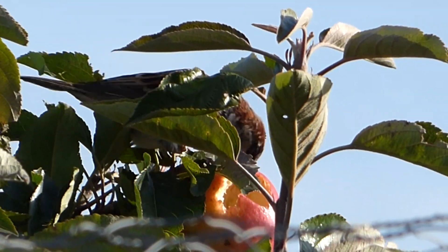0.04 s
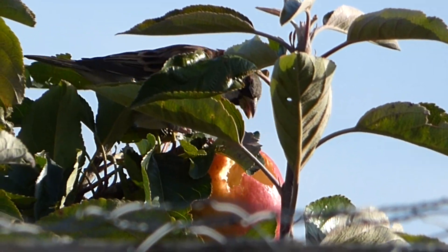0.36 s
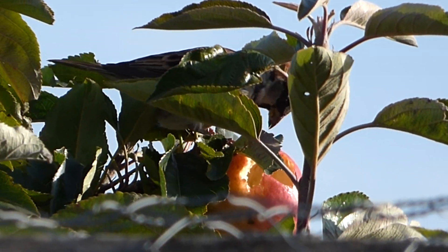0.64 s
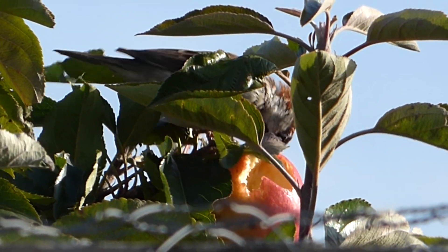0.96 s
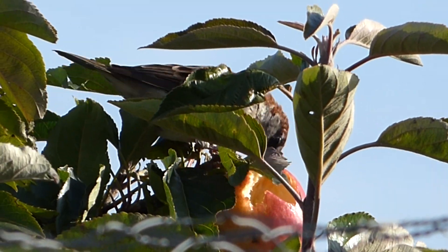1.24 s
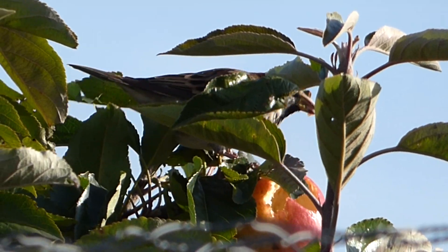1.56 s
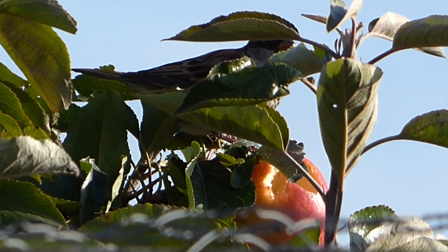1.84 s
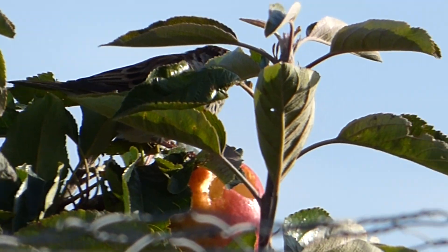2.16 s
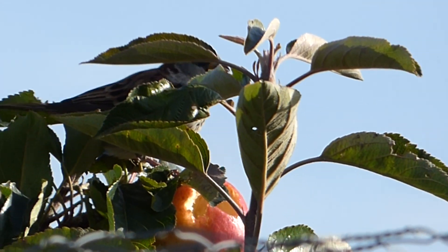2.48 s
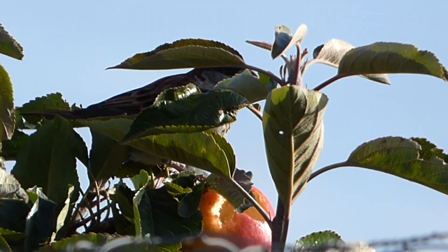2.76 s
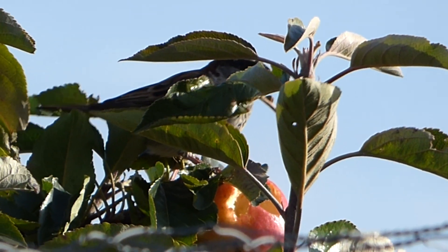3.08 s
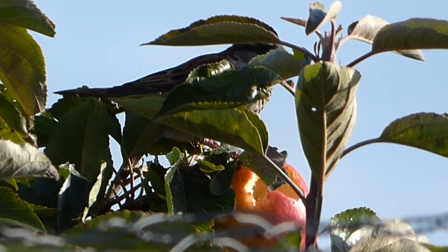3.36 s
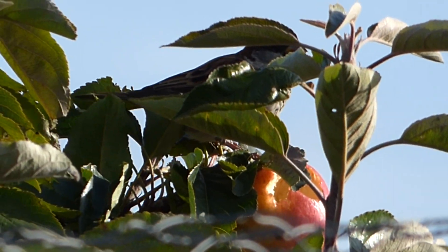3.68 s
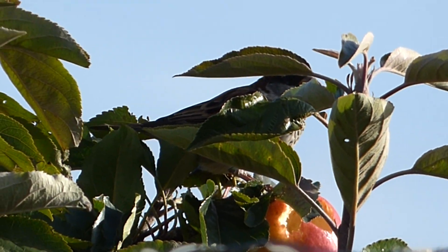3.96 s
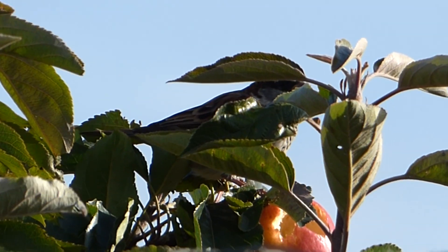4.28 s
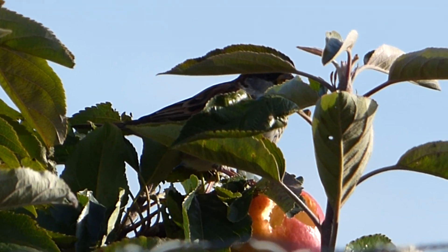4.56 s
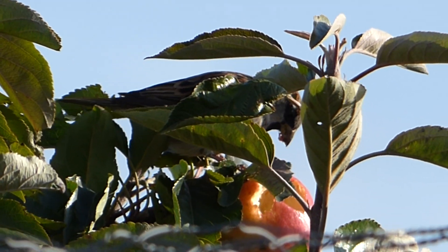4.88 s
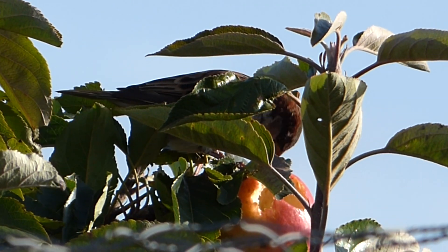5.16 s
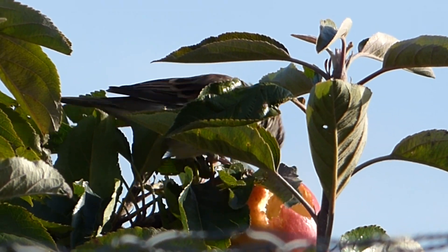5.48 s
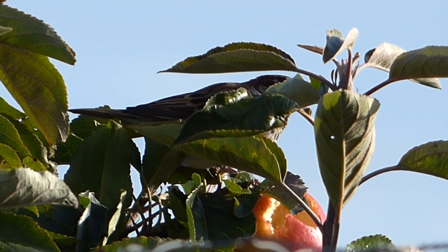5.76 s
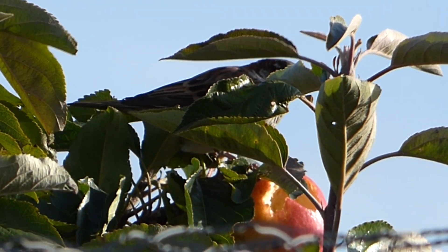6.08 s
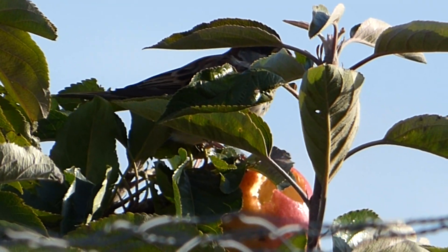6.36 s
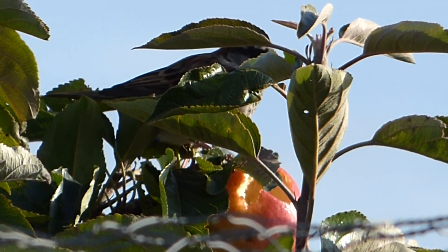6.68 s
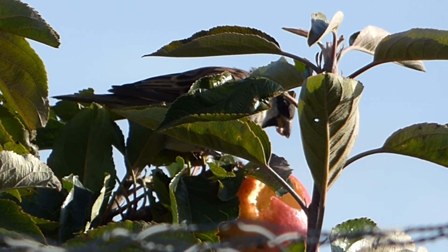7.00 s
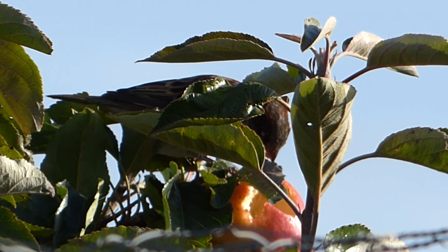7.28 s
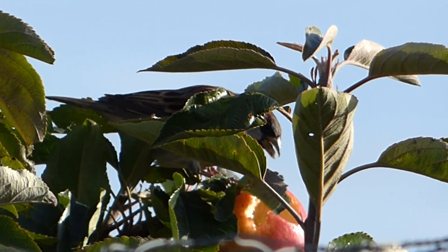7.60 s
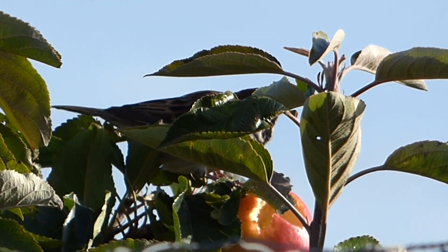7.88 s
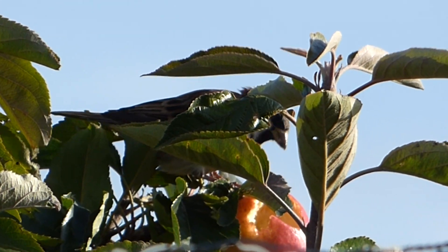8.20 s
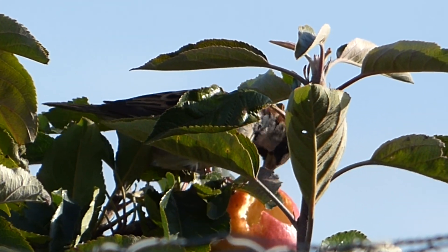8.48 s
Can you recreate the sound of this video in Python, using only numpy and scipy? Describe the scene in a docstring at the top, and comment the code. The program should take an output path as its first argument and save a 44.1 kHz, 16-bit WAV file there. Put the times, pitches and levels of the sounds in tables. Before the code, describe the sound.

Short chirps and raspy chatter from a sparrow in a garden tree, with low wind thumps and a far traffic hum.

```python
"""A sparrow feeds on an apple in a tree: a chirp, harsh chatter ending in a rasp, low grumbles, a cheep.
The membranes of its syrinx make the tones; throat and beak filter them. The beak ticks on the fruit,
and the garden adds a short tail. For a few seconds the eddies of a breeze buffet the microphone.
Under it all: far traffic, hiss, narrow humming resonances and a thin whine."""
import sys
import numpy as np
from scipy import signal
from scipy.fft import rfft, irfft, next_fast_len
from scipy.io import wavfile

SR = 44100
rng = np.random.default_rng(int(sys.argv[2]) if len(sys.argv) > 2 else 0)


def generate_wav(signal):
    """Clip the signal to [-1, 1] and save it as 16-bit WAV at the path in sys.argv[1]."""
    frames = np.transpose(np.atleast_2d(signal))
    scaled = np.clip(frames, -1, 1) * 32767
    pcm = np.round(scaled).astype(np.int16)
    wavfile.write(sys.argv[1], SR, pcm)


N = 376613
TIME_S = np.arange(N) / SR
BAND_LIMIT_HZ = 15850

# Table levels are relative; balance is left over right.
# far traffic and hiss: (frequency [Hz], level [dB])
AMBIENT_SPECTRUM = [(18, -61), (30, -24.5), (108, -9), (292, -1), (324, -3), (359, -0.5), (389, -4.5),
                    (467, 0.5), (546, -4), (591, -3), (1140, -5.5), (2300, -18), (8950, -23), (14300, -41),
                    (15500, -34)]
# their stereo width: (frequency [Hz], side over mid [dB])
AMBIENT_WIDTH = [(60, -8), (150, -48), (300, -85), (700, -5.5), (1500, -9), (3500, -13), (8000, -9),
                 (15000, -7)]
# narrow humming resonances in the background noise:
# (centre [Hz], half-width [Hz], level [dB], balance [dB])
HUM_RESONANCES = [(474, 8.1, -67, 18), (697, 34, -61.5, 1.5), (932, 40, -60.5, -4.5)]
# throat and beak response: (frequency [Hz], gain [dB])
THROAT_RESPONSE = [(700, -57), (1500, -17), (2400, -5), (3100, -2.5), (4200, -2.5), (5200, 8), (6200, 3.5),
                   (7500, -3), (9200, -0.5), (11000, -4), (14000, -18), (16000, -38)]
# clear notes: (start [s], length [s], pitch [Hz], slide [oct], level [dB], overtone tilt [dB/oct])
PEEP_NOTES = [(.007, 0.039, 3210, 0.063, -45.5, -34), (0.718, .028, 3170, 0.027, -55, -36),
              (0.793, 0.018, 3400, 0.3, -49.5, -11), (0.818, 0.039, 3044, 0.059, -44.5, -5),
              (0.855, 0.019, 4640, -0.06, -41.5, -18), (0.874, 0.023, 4600, -0.02, -41, -20),
              (0.872, 0.032, 3560, 0.15, -47, -11), (0.899, 0.0064, 2800, 0, -33, -0.5),
              (0.905, 0.015, 3470, .2, -35.5, -7), (0.922, .032, 4500, -0.227, -29.5, 0.5),
              (0.947, 0.046, 3050, 0.08, -34.5, -1), (0.966, 0.04, 2500, 0.054, -33.5, -1),
              (1.701, .026, 3080, 0.021, -55.5, -26), (2.533, .039, 1540, 0.094, -30.5, -6),
              (2.568, 0.017, 2870, -0.17, -29.5, -2), (2.585, 0.05, 4155, 0.018, -27.5, -13),
              (2.627, 0.019, 3380, -0.12, -25, -3), (2.645, 0.032, 4390, -0.029, -26, -12),
              (2.679, 0.043, 3010, 0.031, -31.5, -4.5), (2.68, .03, 4300, -0.032, -38, -16),
              (2.759, 0.015, 3680, -0.43, -39, -6), (2.769, 0.023, 2300, -0.38, -41, -10),
              (2.793, .016, 2290, 0.37, -36.5, -4), (2.808, 0.019, 4180, 0.045, -34, -7.5),
              (2.818, 0.02, 2510, -0.21, -32.5, -4), (2.848, .03, 3990, -0.094, -33.5, -11),
              (2.876, .046, 2938, 0.046, -29, 3), (2.915, 0.014, 3310, 0.25, -32, -1),
              (4.825, 0.028, 2130, 0.26, -51.5, -11), (4.849, 0.0425, 2330, 0.079, -35.5, -3),
              (5.159, 0.032, 1840, -0.037, -54, -25)]
# harsh notes, low grumbles to loud rasp, where both sides of the syrinx sound at once:
# (start [s], length [s], pitch [Hz], slide [oct], level [dB], overtone tilt [dB/oct], roughness [0-1])
RASP_NOTES = [(0.77, 0.033, 1136, -0.019, -46.5, -6.5, 0.54), (2.46, 0.03, 783, 0.068, -46.5, -14, 0.31),
              (2.499, 0.046, 1540, -0.0049, -37, -7, 0.87), (2.718, 0.048, 3050, -.1, -38.5, 0, 0.65),
              (2.982, 0.05, 926, 0.19, -37, -6, 0.3), (3.021, 0.086, 2910, .1, -26, -2, 0.81),
              (3, 0.093, 3830, 0, -31, -10, 0.45), (3.092, 0.084, 2528, 0.0072, -27, -4, 0.69),
              (3.097, 0.079, 3740, 0, -35.5, -38, 0.56), (3.69, 0.046, 790, -0.059, -50.5, -17, 0.52),
              (3.727, 0.11, 884, -0.049, -44.5, -13, 0.6), (3.748, 0.02, 1695, 0.089, -37, -11, 0.08),
              (3.826, .086, 1950, -0.083, -44.5, -13, 0.96), (4.039, 0.037, 857, -0.072, -33, -6, 0.46),
              (4.138, 0.026, 923, 0.048, -43, -7.5, 0.36), (6.093, 0.029, 946, -0.008, -50, -22, 0.62),
              (6.244, 0.03, 937, -0.081, -52.5, -21, 0.15), (7.45, 0.056, 2150, -0.11, -57.5, -23, .75)]
# first long call: (time [s], pitch [Hz], level [dB])
CHIRP_CONTOUR = [(0.998, 2984, -27.5), (1.012, 3130, -23), (1.035, 3110, -24.5), (1.06, 3123, -25.5),
                 (1.088, 3230, -25.5), (1.1, 3066, -25), (1.109, 3133, -28), (1.116, 3600, -31.5),
                 (1.126, 3560, -41)]
# second long call: (time [s], pitch [Hz], level [dB])
CHEEP_CONTOUR = [(4.882, 2960, -35), (4.903, 3090, -28), (4.922, 3030, -31.5), (4.95, 2876, -31.5),
                 (4.972, 2730, -32.5), (4.988, 2600, -40.5), (5.006, 2877, -35.5), (5.027, 3030, -38)]
# soft rattle: (start [s], level [dB])
RATTLE_PIPS = [(3.811, -40.5), (3.835, -37.5), (3.849, -33.5), (3.862, -38), (3.883, -45)]
# voice direction as the head turns: (time [s], balance [dB])
HEAD_BALANCE = [(1.0, -3), (2.7, -1.5), (3.1, -0.1), (3.8, 1.1), (4.8, 4.5), (6.2, 4)]
# breeze strength: (time [s], level [dB])
BREEZE_LEVEL = [(2.05, -75), (2.11, -44.5), (2.37, -50), (2.5, -34.5), (2.6, -42.5), (2.73, -34),
                (3.08, -35.5), (3.15, -47), (3.31, -34.5), (3.52, -37), (3.73, -47), (3.83, -37),
                (4.13, -34.5), (4.44, -43.5), (5.14, -50), (5.28, -33), (5.85, -50.5), (8.5, -61)]
# turbulence at the microphone: (frequency [Hz], level [dB])
EDDY_SPECTRUM = [(18, -61), (30, -34.5), (155, 1), (264, 2), (360, -2.5), (392, -8), (449, -6), (644, -13),
                 (791, -21.5), (939, -21.5), (1080, -25.5), (1800, -36), (2340, -41), (3960, -120)]
# its stereo width: (frequency [Hz], side over mid [dB])
EDDY_WIDTH = [(40, -14), (120, -2), (200, -9), (380, 0), (700, 9), (1500, 0.5)]
# fine eddies as the breeze veers: (time [s], upper-band gain [dB])
FINE_EDDY_GAIN = [(2.1, -17), (2.8, 10), (3.1, 6), (3.4, -0.5), (4.15, -4.5), (4.85, -33), (5.3, 0),
                  (5.9, -12)]
# gusts on the microphone: (time [s], level [dB], tilt [dB/oct], balance [dB])
GUST_HITS = [(2.095, -36, -21, -10), (2.174, -29, -3, 4), (2.259, -29.5, -10, -5), (2.489, -20, 1.5, 0.5),
             (2.728, -20.5, 9.5, 1.5), (2.86, -22.5, 5, 2), (2.962, -15.5, 6, 1.5), (3.197, -25, -3, 1.5),
             (3.281, -21, 0, -0.5), (3.823, -32, 1, 11), (3.923, -30.5, 3, 1), (4.046, -20.5, -3.5, -8),
             (4.08, -25.5, -11, -9), (4.154, -27, -19, -9), (4.246, -23.5, -20, -8.5),
             (4.346, -29, 1.5, 8.5), (4.527, -26, -8.5, -3.5), (4.687, -32.5, -11, -4),
             (4.774, -23.5, -5, -3), (4.89, -31.5, -8, 5), (5.283, -21, 3, 4.5), (5.407, -33.5, 5, -5),
             (6.658, -40, -12, 0), (7.209, -40, -5, 0)]
# beak on apple: (time [s], level [dB], centre [Hz], decay [s])
BEAK_TICKS = [(6.739, -54, 8500, .002), (6.78, -62, 8500, .004), (7.73, -48, 3500, 0.0035),
              (8.409, -50, 10000, 0.0033)]
# microphone response dips: (centre [Hz], width [Hz], depth [0-1])
MIC_DIPS = [(386, 25.6, 0.78), (610, 46, 0.1), (4300, 38, 0.8)]


def amp(db):
    """Decibels to gain."""
    return 10 ** (np.asarray(db) / 20)


def unit_rms(x):
    """Scale to rms 1."""
    return x / np.sqrt(np.mean(x ** 2) + 1e-20)


def at_hz(points, hz):
    """Interpolate on a log-frequency axis."""
    f, value = np.transpose(points)
    return np.interp(np.log(hz + 1), np.log(f + 1), value)


def at_time(points, s):
    """Interpolate over time."""
    return np.interp(s, *np.transpose(points))


def noise(size, shape):
    """Noise of rms 1, spectral gain shape(Hz)."""
    padded = next_fast_len(size + 2048)
    spectrum = rfft(rng.standard_normal(padded)) * shape(np.fft.rfftfreq(padded, 1 / SR))
    return unit_rms(irfft(spectrum, padded)[:size])


def wander(size, rate_hz):
    """Random curve of rms 1, low-passed at rate_hz."""
    return noise(size, lambda f: 1 / (1 + (f / rate_hz) ** 4))


def wide_noise(size, shape, width):
    """Stereo noise: mid of rms 1, independent side."""
    hz = np.fft.rfftfreq(size, 1 / SR)
    mid, side = rfft(rng.standard_normal((2, size))) * shape(hz)
    mid, side = irfft(mid, size), irfft(side * amp(at_hz(width, hz)), size)
    return np.array([mid + side, mid - side]) / mid.std()


def gate(t, attack_s, release_s):
    """Linear attack, hold, release."""
    return np.clip(np.minimum(t / attack_s, (t[-1] - t) / release_s), 0, 1)


def pan(x, balance_db):
    """Left over right by balance_db."""
    return x * amp([[balance_db / 2], [-balance_db / 2]])


def add(mix, start_s, sound):
    """Mix in at start_s."""
    part = mix[:, max(round(start_s * SR), 0):][:, :sound.shape[-1]]
    part += sound[..., :part.shape[-1]]


def background(bed_db=-50.5, swell_db=0.3, swell_hz=2):
    """Far traffic and hiss, plus narrow humming resonances; all swell slightly."""
    out = amp(bed_db) * wide_noise(N, lambda f: amp(at_hz(AMBIENT_SPECTRUM, f)), AMBIENT_WIDTH)
    for hz, half_width_hz, db, balance_db in HUM_RESONANCES:
        hum = [noise(N, lambda f: 1 / (1 + ((f - hz) / half_width_hz) ** 2)) for _ in range(2)]
        out += pan(amp(db) * np.array(hum), balance_db)
    return out * amp(swell_db * wander(N, swell_hz))


def whine(hz=15625, rms_db=-86):
    """The camera's thin, steady tone."""
    return amp(rms_db) * np.sqrt(2) * np.sin(2 * np.pi * hz * TIME_S)


def syrinx(pitch_hz, level_db, tilt_db_oct, rough, knee_hz=10000,
           warble_hz=220, jitter_hz=1300, flutter_hz=500, flutter_db=3, hiss=0.3):
    """Membrane tone through the throat; warbles and breaks up with roughness."""
    size = len(pitch_hz)
    pitch_hz = pitch_hz * np.exp(rough * 0.1 * wander(size, warble_hz))
    jitter = 1 + rough * 0.078 * wander(size, jitter_hz)
    phase = 2 * np.pi * np.cumsum(pitch_hz * jitter) / SR
    k = np.arange(1, 17)[:, None]
    partial_hz = k * pitch_hz
    # above the knee the tilt is -8 dB/oct or steeper
    above_knee_oct = np.maximum(np.log2(partial_hz / knee_hz), 0)
    source_db = tilt_db_oct * np.log2(k) - np.maximum(tilt_db_oct + 8, 0) * above_knee_oct
    gains = amp(source_db + at_hz(THROAT_RESPONSE, partial_hz)) * (partial_hz < BAND_LIMIT_HZ)
    tone = (gains * np.sin(k * phase)).sum(0) / np.sqrt((gains ** 2).sum(0) / 2)
    air_db_oct = np.mean(tilt_db_oct)
    air = noise(size, lambda f: amp(at_hz(THROAT_RESPONSE, f) + air_db_oct * np.log2(1 + f / 1500)))
    air *= 1 + np.cos(phase)  # turbulence escapes once a cycle
    flutter = amp(rough * flutter_db * (wander(size, flutter_hz) - 1.14))
    return (tone + hiss * rough * air) * flutter * amp(level_db)


def peep(length_s, hz, slide_oct, db, tilt_db_oct, register_hz=3900, settle_s=0.0018,
         scoop_oct=0.093, arch_oct=0.058, drop_oct=0.17, sag_oct=0.071):
    """Clear sliding note: scoops up and arches above the register break, drops in and sags below."""
    t = np.arange(0, length_s, 1 / SR)
    position = t / length_s - 0.5
    ends = (2 * position) ** 2
    onset = np.exp(-t / settle_s)
    if hz > register_hz:
        bend_oct = -arch_oct * ends - scoop_oct * onset
    else:
        bend_oct = sag_oct * ends ** 2 + drop_oct * onset
    pitch_hz = hz * 2 ** (slide_oct * position + bend_oct)
    swell_db = 2 + 1.2 * max(-42 - db, 0)  # faint notes taper more
    voice = syrinx(pitch_hz, db - swell_db * ends, tilt_db_oct, rough=0.085)
    return voice * gate(t, attack_s=0.00081, release_s=0.0015)


def garden(x, tail_db=-17, low_t60_s=0.58, high_t60_s=0.47, split_hz=7000,
           leaves_db=-15, leaves_decay_s=0.024, echoes_per_s=2500, spread=0.12):
    """Early scatter off leaves; thin tail off farther walls and trees."""
    t = TIME_S[:SR // 2]
    signs = rng.choice([-1., 1.], (2, len(t)))
    echoes = signs * (rng.random((2, len(t))) < echoes_per_s / SR) * (t > 0.002)
    low = signal.sosfilt(signal.butter(2, split_hz, fs=SR, output="sos"), echoes)
    high = signal.sosfilt(signal.butter(2, split_hz, "high", fs=SR, output="sos"), echoes)
    tail = low * amp(-60 * t / low_t60_s) - 0.31 * high * amp(-60 * t / high_t60_s)
    leaves = low[:, ::-1] * np.exp(-t / leaves_decay_s) * (t > 0.001)
    tail *= amp(tail_db) / np.linalg.norm(tail[0])
    leaves *= amp(leaves_db) / np.linalg.norm(leaves[0])
    mid, side = tail + leaves
    response = np.array([mid + spread * side, mid - spread * side])
    return signal.fftconvolve(x, response, axes=1)[:, :N]


def rasp(length_s, hz, slide_oct, db, tilt_db_oct, rough, throb_hz=78):
    """Harsh note; throb deepens with roughness."""
    t = np.arange(0, length_s, 1 / SR)
    pitch_hz = hz * 2 ** (slide_oct * (t / length_s - 0.5))
    throb_db = -rough * np.sin(2 * np.pi * throb_hz * t)
    voice = syrinx(pitch_hz, db + throb_db, tilt_db_oct, rough)
    return voice * gate(t, attack_s=0.0079, release_s=0.013)


def long_call(contour, quaver_hz=101, quaver_peak_s=0.0223, quaver_spread_s=0.0269,
              first_dip_s=0.0048, dip_oct=0.2, dip_db=2.5):
    """Chirp or cheep: quavers hoarsely, clears, dulls as it fades."""
    start_s, end_s = contour[0][0], contour[-1][0]
    t = np.arange(0, end_s - start_s, 1 / SR)
    times_s, *curves = np.transpose(contour)
    pitch_hz, level_db = (np.interp(start_s + t, times_s, curve) for curve in curves)
    quaver = np.exp(-((t - quaver_peak_s) / quaver_spread_s) ** 2)
    dips = quaver * np.cos(np.pi * quaver_hz * (t - first_dip_s)) ** 4
    tilt_db_oct = 1.9 + level_db - level_db.max()
    voice = syrinx(pitch_hz * 2 ** (-dip_oct * dips), level_db - dip_db * dips, tilt_db_oct,
                   rough=0.084 + 0.2 * quaver, knee_hz=6500)
    return voice * gate(t, attack_s=0.002, release_s=0.002)


def breeze(gain_db=-2, lumps_db=4, lumps_hz=26, split_hz=400, balance_db=2):
    """Lumpy turbulence at the microphone: dull rumble, turning to flutter as it veers."""
    level_db = at_time(BREEZE_LEVEL, TIME_S) + lumps_db * wander(N, lumps_hz)
    eddies = wide_noise(N, lambda f: amp(at_hz(EDDY_SPECTRUM, f)), EDDY_WIDTH)
    rumble = signal.sosfiltfilt(signal.butter(2, split_hz, fs=SR, output="sos"), eddies)
    flutter = (eddies - rumble) * amp(at_time(FINE_EDDY_GAIN, TIME_S))
    return pan((rumble + flutter) * amp(level_db + gain_db), balance_db)


def gusts(gain_db=-9, length_s=0.042, lead_s=0.005):
    """Single eddies thump the microphone, a few cycles of rumble each."""
    out, size = np.zeros((2, N)), int(length_s * SR)
    push = np.interp(np.linspace(0, 1, size), [0, 0.185, 0.37, 1], [0.023, 0.63, 0.94, 0.0073])
    for s, db, tilt_db_oct, balance_db in GUST_HITS:
        def shape(f):
            return amp(at_hz(EDDY_SPECTRUM, f) + tilt_db_oct * np.log2(np.clip(f, 240, 800) / 300))
        thump = unit_rms(wide_noise(size, shape, EDDY_WIDTH) * push)
        add(out, s - lead_s, pan(thump * amp(db + gain_db), balance_db))
    return out


def pip(length_s=0.0107, hz=2010, rough=0.34, edge_s=0.0027):
    """One rattle pip: a dull tone under a stronger octave."""
    t = np.arange(0, length_s, 1 / SR)
    pitch_hz = np.full(len(t), hz)
    tone = syrinx(pitch_hz, level_db=-9, tilt_db_oct=-14, rough=rough)
    octave = syrinx(2 * pitch_hz, level_db=0, tilt_db_oct=-25, rough=rough)
    return (tone + octave) * gate(t, edge_s, edge_s)


def beak(width_oct=0.8):
    """Tiny dry snaps of beak and apple skin."""
    out, t = np.zeros((2, N)), TIME_S[:SR // 20]
    for s, db, hz, decay_s in BEAK_TICKS:
        snap = noise(len(t), lambda f: np.exp(-(np.log2((f + 1) / hz) / width_oct) ** 2 / 2))
        add(out, s, amp(db) * snap * np.exp(-t / decay_s))
    return out


def sparrow(long_gain_db=0.36, peep_gain_db=-0.5):
    """All calls, panned as the head turns, plus beak ticks."""
    calls = [(contour[0][0], amp(long_gain_db) * long_call(contour))
             for contour in (CHIRP_CONTOUR, CHEEP_CONTOUR)]
    calls += [(s, amp(peep_gain_db) * peep(*note)) for s, *note in PEEP_NOTES]
    calls += [(s, rasp(*note)) for s, *note in RASP_NOTES]
    calls += [(s, amp(db) * pip()) for s, db in RATTLE_PIPS]
    out = np.zeros((2, N))
    for s, call in calls:
        add(out, s, pan(call, at_time(HEAD_BALANCE, s)))
    return out + beak()


def scene():
    """Bird in its garden, wind, background."""
    bird = sparrow()
    return bird + garden(bird) + breeze() + gusts() + background() + whine()


def record(dry):
    """Microphone dips, then band limit."""
    hz = np.fft.rfftfreq(N, 1 / SR)
    dips = [1 - depth / (1 + 2j * (hz - centre_hz) / width_hz) for centre_hz, width_hz, depth in MIC_DIPS]
    heard = irfft(rfft(dry) * np.prod(dips, axis=0), N)
    lowpass = signal.firwin(1023, BAND_LIMIT_HZ, window=("kaiser", 9), fs=SR)
    return signal.oaconvolve(heard, lowpass[None], "same")


dry = scene()
out = record(dry)
generate_wav(out)
```